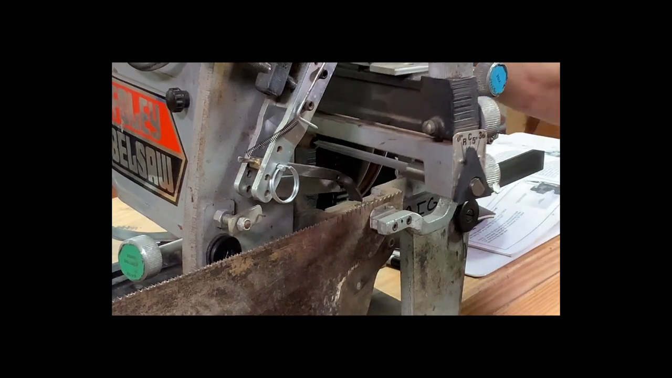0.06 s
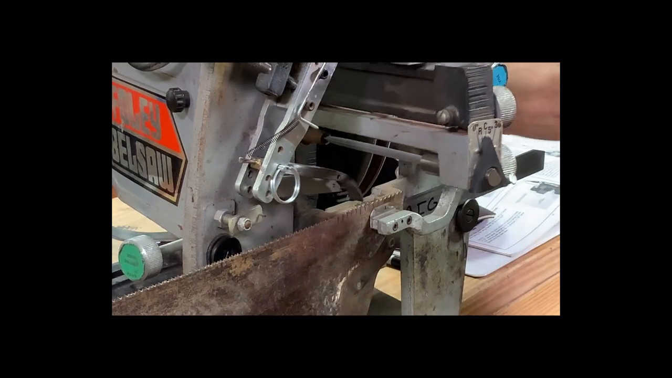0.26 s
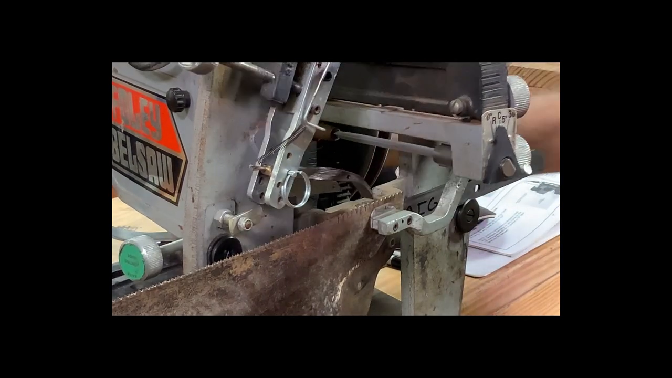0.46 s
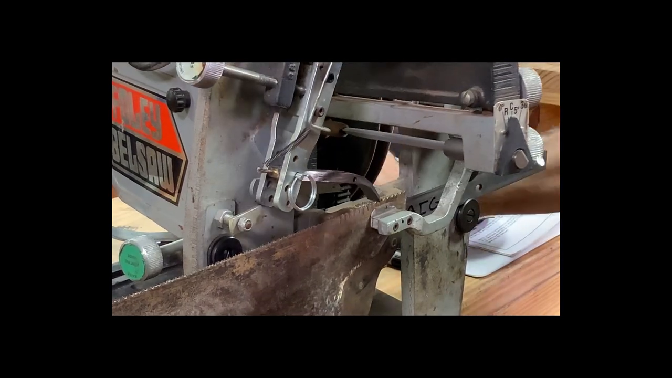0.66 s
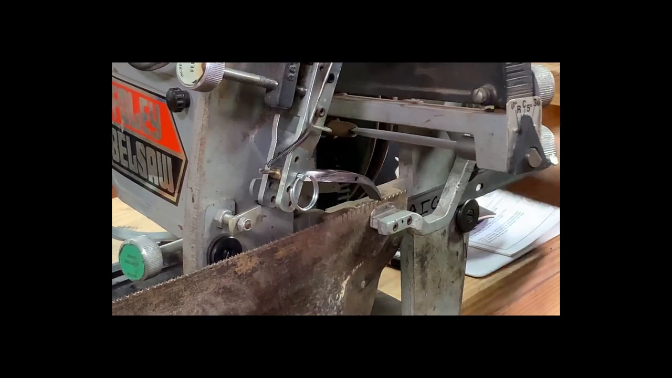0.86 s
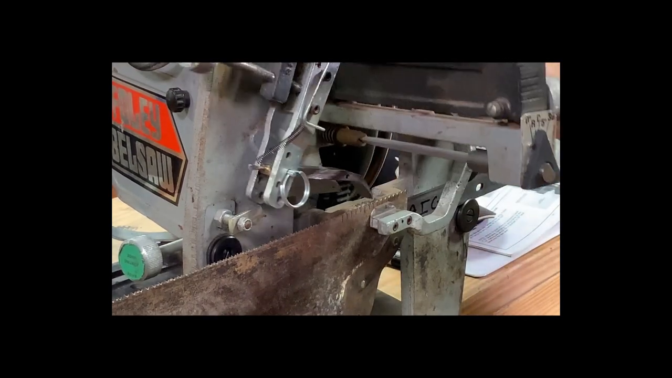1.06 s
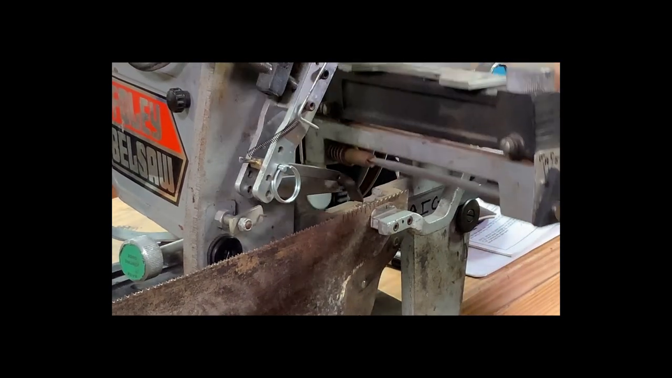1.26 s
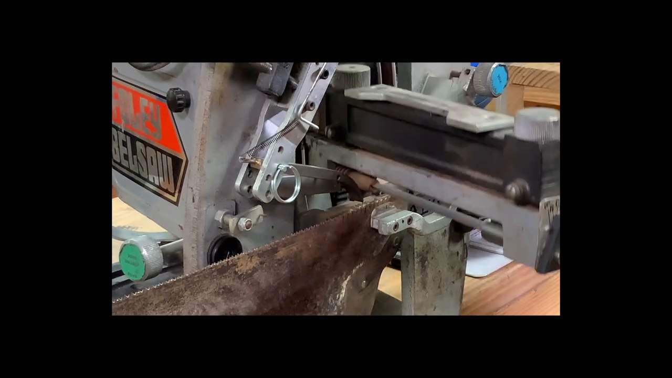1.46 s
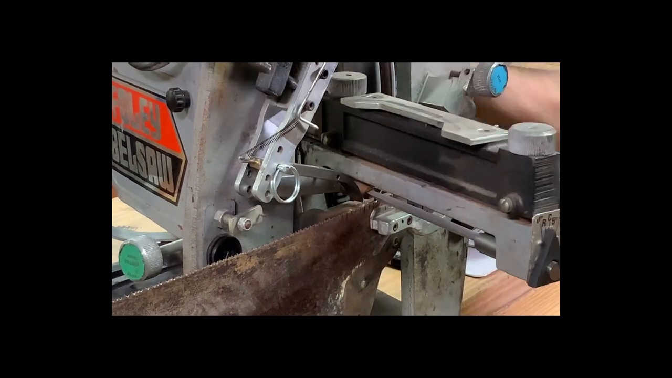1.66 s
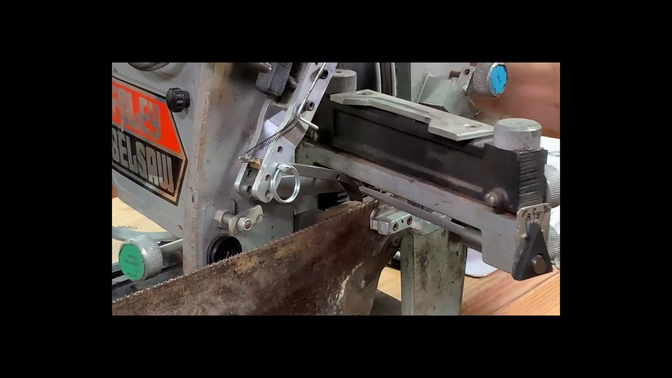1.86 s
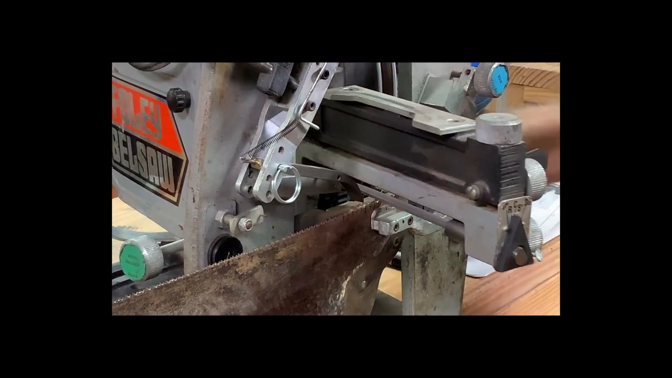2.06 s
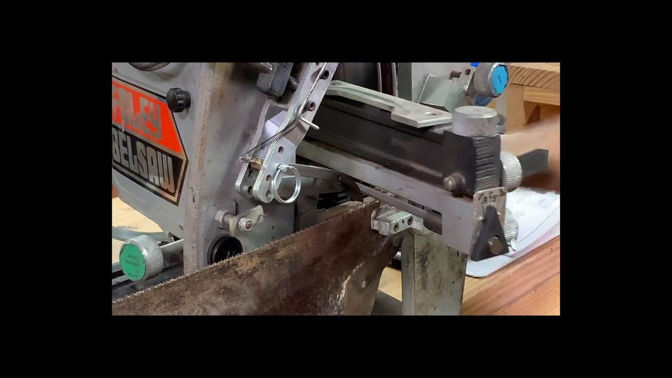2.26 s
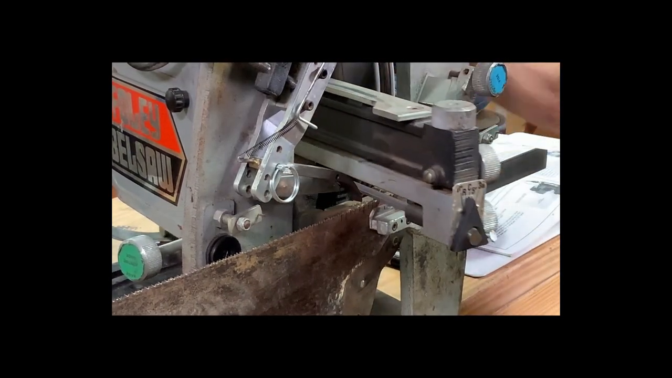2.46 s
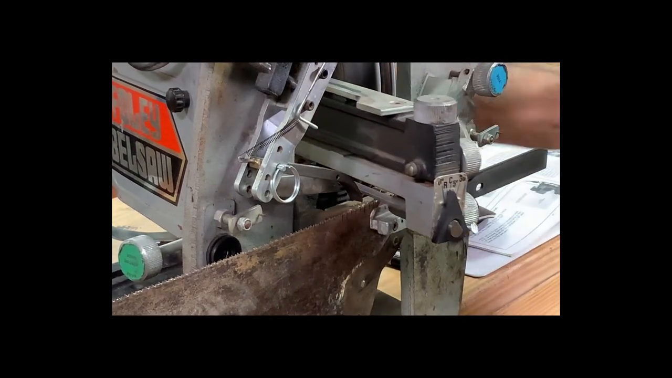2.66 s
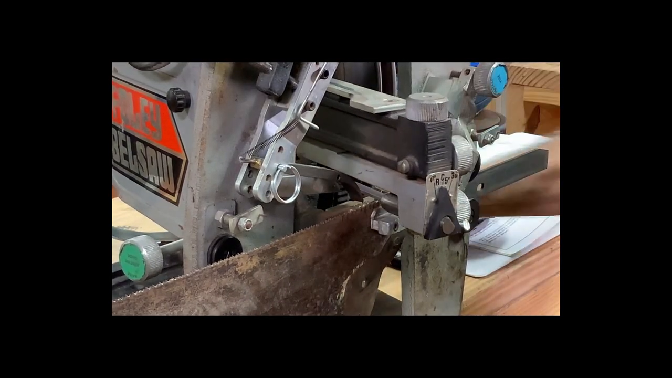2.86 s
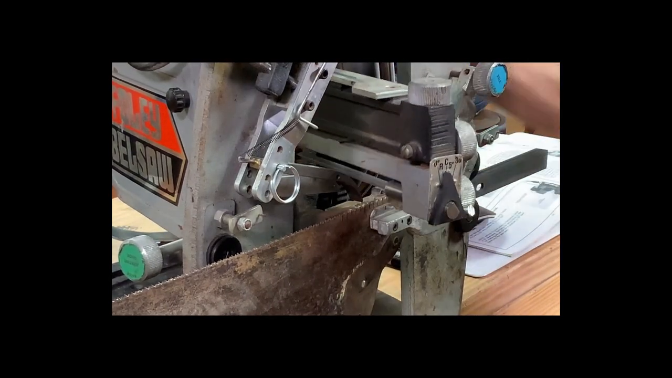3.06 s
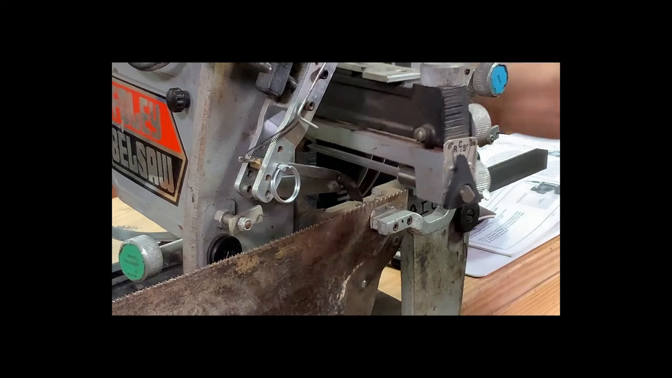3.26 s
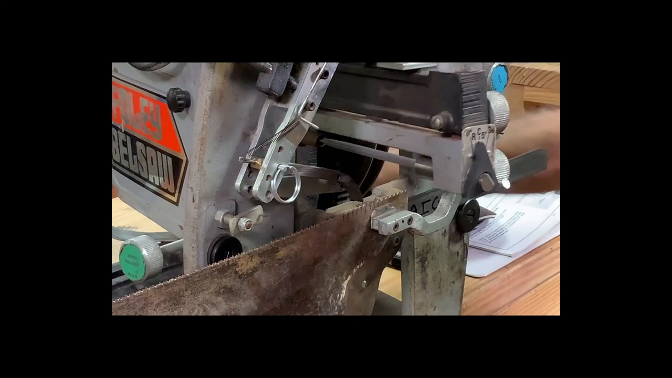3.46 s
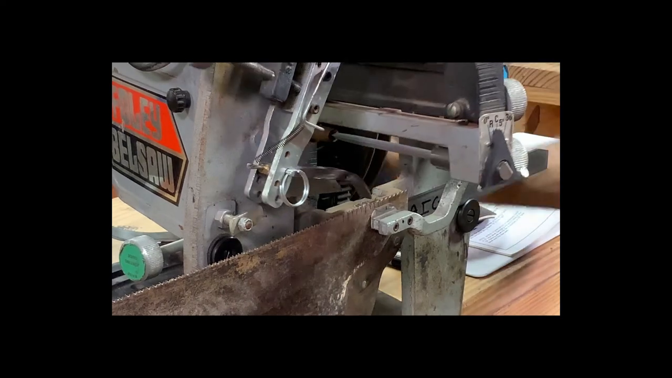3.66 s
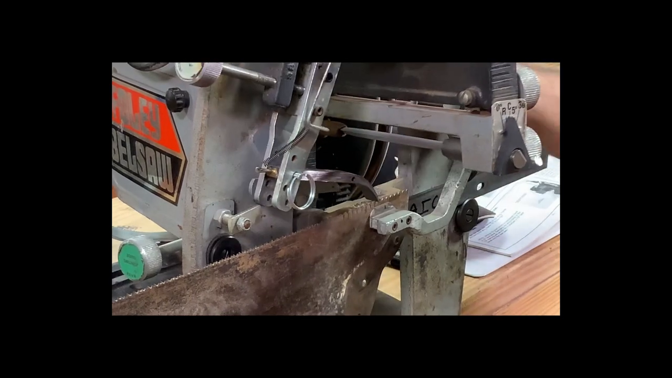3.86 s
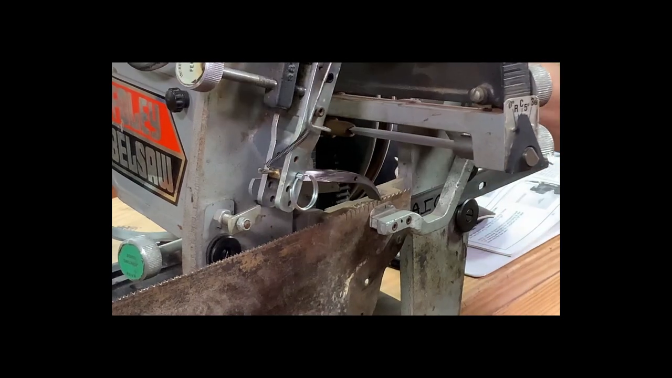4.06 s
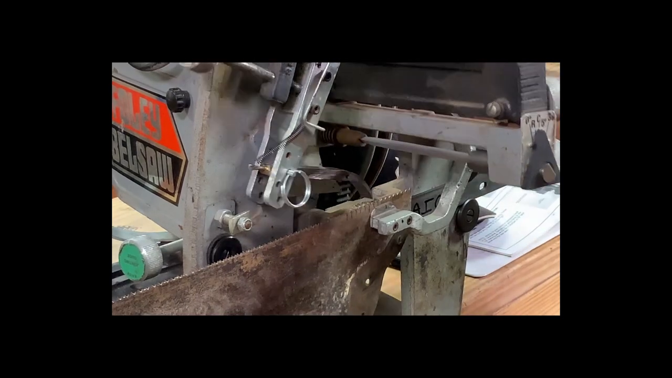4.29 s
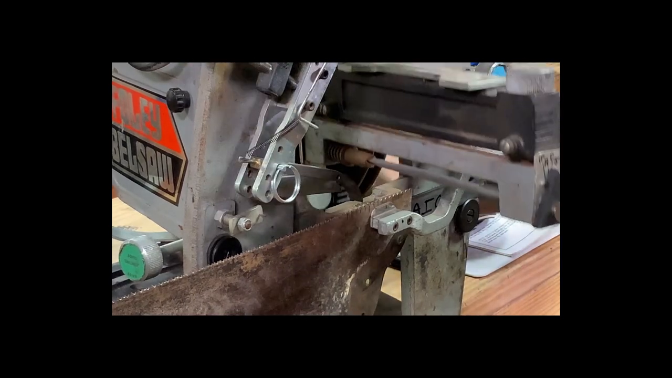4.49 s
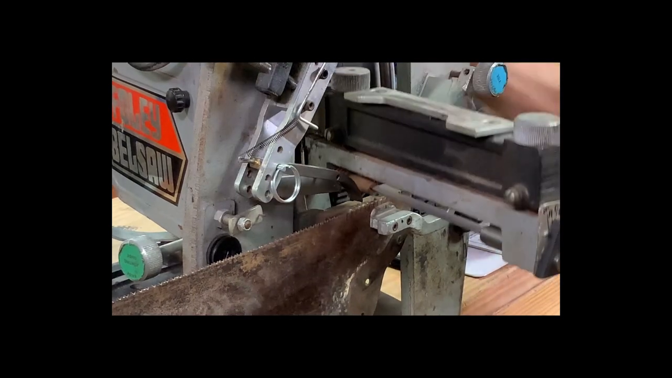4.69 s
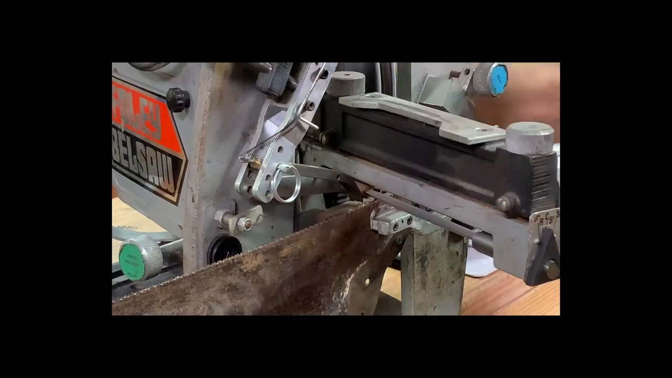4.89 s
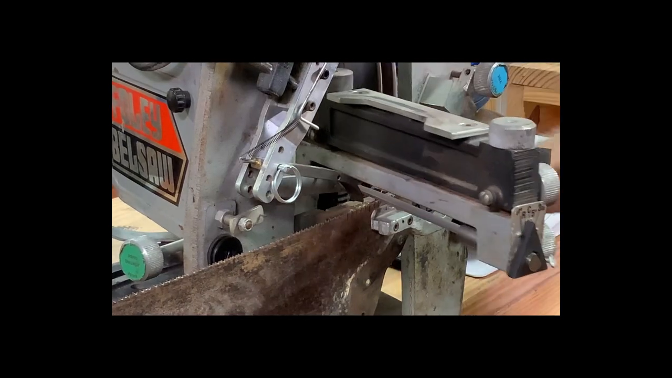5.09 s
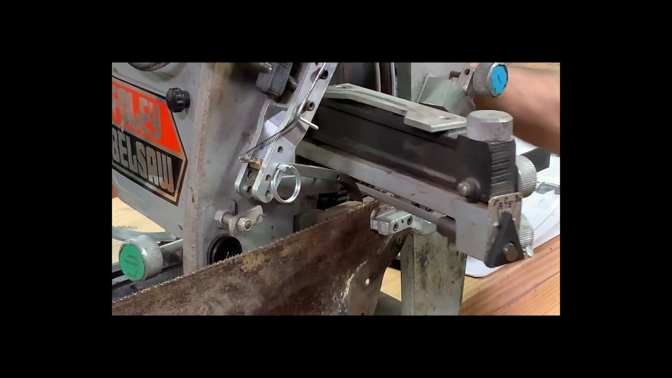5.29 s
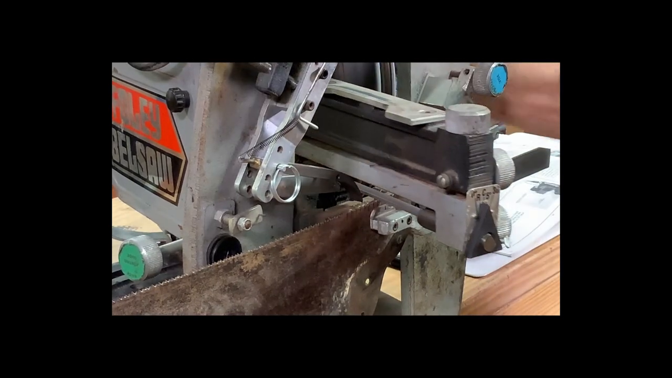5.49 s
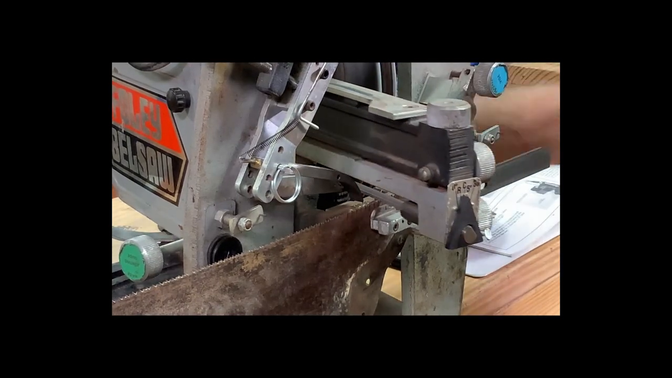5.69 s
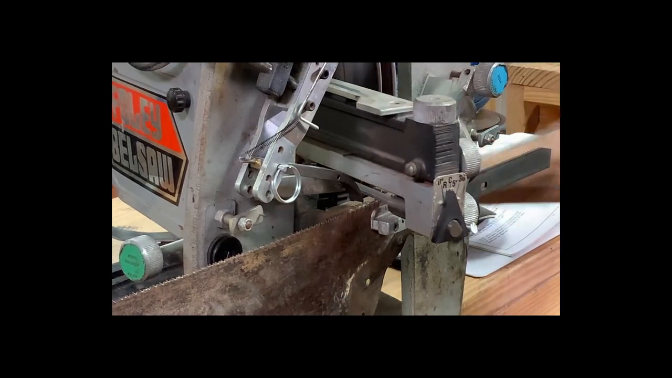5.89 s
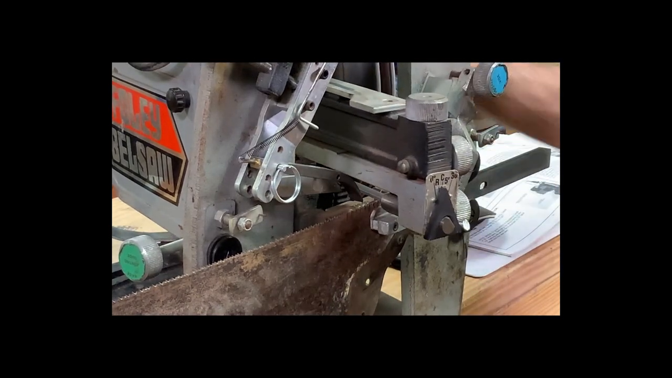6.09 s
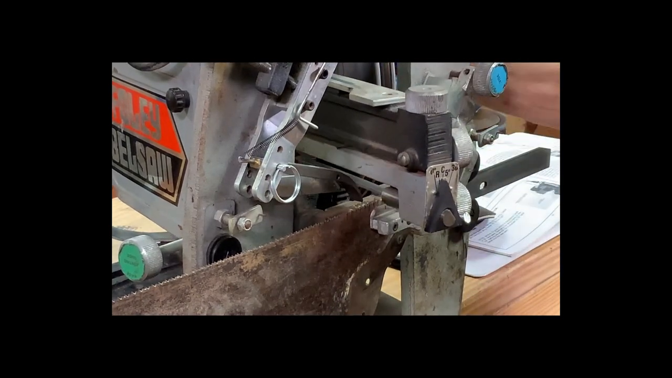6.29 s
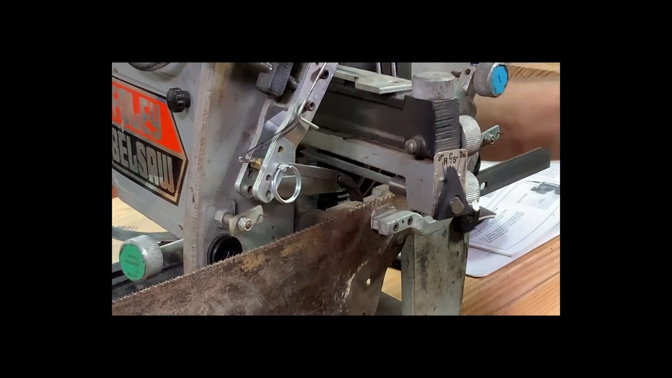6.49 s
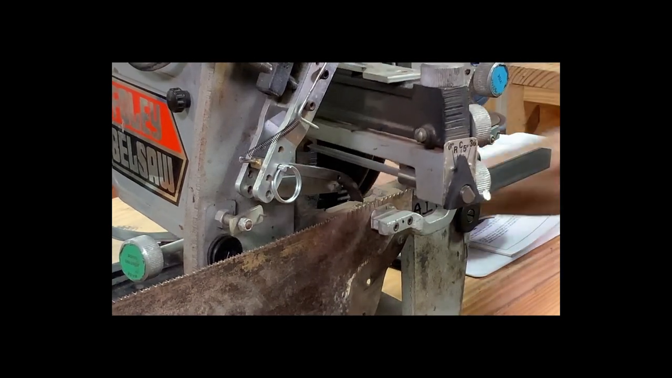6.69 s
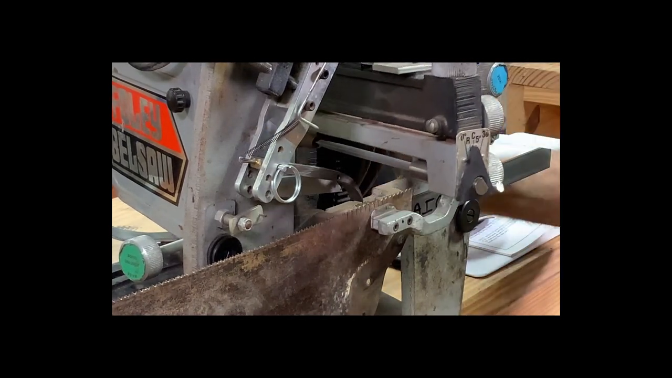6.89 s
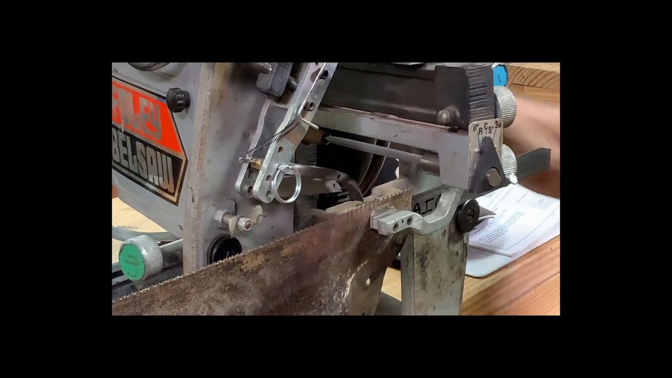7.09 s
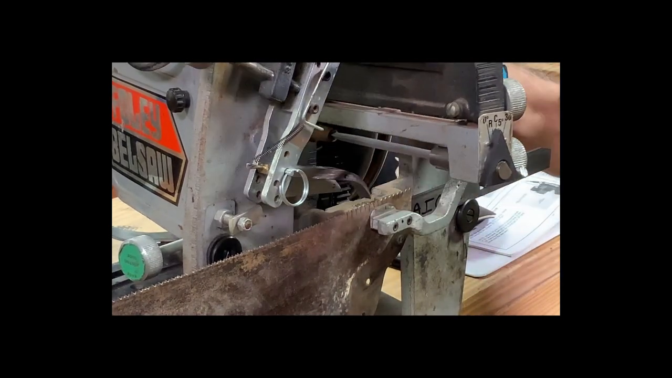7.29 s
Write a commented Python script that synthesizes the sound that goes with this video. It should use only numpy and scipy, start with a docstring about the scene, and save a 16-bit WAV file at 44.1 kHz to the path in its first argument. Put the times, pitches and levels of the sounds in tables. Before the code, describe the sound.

A saw filing machine runs in a workshop, heard close in stereo, with continuous low motor hum, rumble and faint hiss. Dull knocks and sharp metal clicks come from its linkage, strongest around 1 second. From 1.6 to 2.8 seconds a file rasps across a hand saw's teeth, catching, stalling and pushing again while the blade rings. Short, very high squeals break through; at the loudest, near 2 seconds, the hum suddenly drops. A quick falling screech follows at 2.5 seconds. The hum rises again from 3.3 seconds, with more clicks and knocks around 4.2. A second stroke scrapes from 4.8 to 6.1 seconds, with a sharp click, a piercing squeal and another drop in the hum near 5.2, then a falling screech at 5.6. From about 6.5 seconds the hum returns at a lower level, with one faint click near 7.

```python
"""A machine-driven file rasps twice across the teeth of an old hand saw in a workshop: grain noise rings on in the blade.
The blade sings in clusters of modes, breaks into short high stick-slip squeals and screeches downward in each skid.
Feed linkage clicks and knocks as struck resonances, mostly between strokes.
Motor tones, rumble and a background hiss run throughout, heard by a close pair of microphones.
Hum and rumble stand high up to each loud squeal, drop suddenly, and later rise again to a lower level."""
import sys
import numpy as np
from scipy import signal
from scipy.fft import rfft, irfft, next_fast_len
from scipy.io import wavfile
from scipy.ndimage import uniform_filter1d

SR = 44100
rng = np.random.default_rng(int(sys.argv[2]) if len(sys.argv) > 2 else 0)


def output_pcm(signal):
    """Save a mono or channel-first signal as 16-bit PCM at the path in sys.argv[1].

    Samples are clipped to [-1, 1] before scaling.
    """
    pcm = np.clip(np.atleast_2d(signal).T, -1, 1) * 32767
    wavfile.write(sys.argv[1], SR, np.round(pcm).astype(np.int16))


N = 323880
TIME = np.arange(N) / SR
SIZE = next_fast_len(N + SR)
FREQS = np.maximum(np.arange(SIZE // 2 + 1) * SR / SIZE, 1)

# File strokes, each two pushes with a stall between. Each row: touch, stall, second push and lift in seconds,
# then first push, second push and level at the lift in dB before the layer gains.
STROKES = [(1.638, 1.978, 2.236, 2.723, -31, -26.5, -36), (4.824, 5.268, 5.39, 5.992, -35, -30, -41)]
# The file catches on a tooth. Each row: start in seconds, length in seconds, scrape in dB before the layer gain,
# frequency in Hz of the blade modes it wakes, their level in dB before the layer gain.
BITES = [(1.676, 0.0232, -24, 3930, -43), (1.725, 0.019, -26.5, 4300, -30),
         (1.806, 0.031, -32.5, 3100, -24), (1.841, 0.059, -23, 1980, -31.5), (1.901, 0.038, -33, 4470, -30),
         (1.95, 0.028, -21.5, 3390, -24.5), (2.041, 0.019, -20.5, 3000, -39),
         (2.068, 0.044, -22.5, 1650, -37), (2.116, 0.053, -20, 1580, -36), (2.239, 0.021, -23, 8600, -26),
         (2.276, 0.03, -26, 4060, -24), (2.263, 0.1, -26, 1975, -30.5), (2.307, 0.037, -21, 7800, -25),
         (2.352, 0.041, -18.5, 4340, -28), (2.412, 0.033, -29.5, 1970, -38),
         (2.787, 0.028, -38.5, 3900, -49.5), (2.828, .016, -24.5, 1930, -48),
         (2.846, 0.022, -24.5, 4300, -50), (4.844, 0.019, -42, 3660, -42), (4.888, 0.057, -30, 4140, -37),
         (4.994, 0.087, -21.5, 3200, -26), (5.009, 0.041, -25.5, 1250, -32),
         (5.035, 0.045, -31, 4400, -22.5), (5.09, .04, -33.5, 2100, -34), (5.177, 0.02, -18.5, 4000, -33.5),
         (5.202, 0.039, -21.5, 1980, -33.5), (5.234, .024, -15.5, 4100, -39.5),
         (5.366, 0.041, -25, 4250, -41.5), (5.394, 0.032, -22, 4100, -36.5),
         (5.453, 0.034, -23.5, 1930, -33), (5.555, 0.048, -46, 1950, -39.5),
         (5.683, 0.019, -34.5, 1870, -46.5), (5.739, .028, -23.5, 1230, -39),
         (5.812, 0.089, -26.5, 4200, -49), (5.934, 0.025, -22, 1930, -43), (6.054, 0.013, -33.5, 3770, -57),
         (6.094, 0.035, -30, 1940, -47)]
# Once a stroke the file skids with a falling screech; one curve for each skid.
# Each row: time in seconds, pitch in Hz, level in dB before response and layer gain, line width of the fundamental in Hz.
SKIDS = [
    [(2.395, 5790, -33, 300), (2.452, 5590, -19.5, 200), (2.472, 5390, -15.5, 350), (2.482, 4930, -22, 302),
     (2.51, 4850, -20.5, 200), (2.519, 4400, -19, 400), (2.542, 4450, -33, 400), (2.556, 4220, -50, 400),
     (2.577, 4120, -26.5, 80), (2.605, 4020, -44, 200)],
    [(5.563, 5680, -37, 270), (5.583, 5660, -20.5, 110), (5.628, 5650, -20.5, 130),
     (5.64, 5050, -23.5, 110), (5.655, 4990, -19.5, 23), (5.68, 5020, -23.5, 40), (5.69, 4540, -30, 460),
     (5.725, 4400, -37.5, 600)],
]
# Spells in which hum and rumble stand high, each ended by a sudden drop.
# Each row: start in seconds, drop in seconds, motor hum in dB, rumble in dB before its climb.
HIGH_SPELLS = [(-.08, 1.965, -33.5, -35.5), (3.3, 5.22, -38.5, -40.5), (6.55, 8.4, -42, -43.5)]
# Resonances of the machine frame. Each row: frequency in Hz, width in Hz, level in dB above the broad spectrum.
FRAME_MODES = [(157, 7.5, 4.3), (274.3, 5.7, 4), (363, 6.3, 2.75), (774, 89, 4)]
AIR_DB, TOUCH_DB = -58, -40   # rasp with the file barely clear and newly set down, before the layer gains


def from_db(db):
    """Amplitude gain is ten to the power of a twentieth of the decibels."""
    return 10 ** (np.asarray(db) / 20)


def rms_one(x):
    """Normalise mean-square amplitude, so that the signal has unit power."""
    return x / np.sqrt(np.mean(x ** 2) + 1e-20)


def in_time(rows):
    """Linear interpolation joins the columns of a table into curves over time."""
    seconds, *columns = np.transpose(rows)
    return [np.interp(TIME, seconds, column) for column in columns]


def at_hz(points):
    """A table is interpolated on a logarithmic frequency axis."""
    hz, value = np.transpose(points)
    return np.interp(np.log(FREQS), np.log(hz), value)


def filtered(x, response):
    """Linear filtering: the spectrum of the signal is multiplied by a frequency response."""
    return irfft(rfft(x, SIZE) * response, SIZE)[..., :N]


def coloured(x, spectrum):
    """Spectral shaping gives a signal its colour; rms 1."""
    return rms_one(filtered(x, from_db(at_hz(spectrum))))


def drift(rate):
    """Slow random modulation: chance values joined by lines, `rate` a second, with a spread of about 1."""
    return np.interp(TIME * rate, np.arange(N // 8), rng.standard_normal(N // 8)) * np.sqrt(3 / 2)


def diffuse(pair):
    """Interchannel coherence: two unrelated signals are mixed as mid and side into a partly alike left and right."""
    # Each row: frequency in Hz, left-right likeness of diffuse sound (0-1).
    likeness = [(150, .999), (400, .87), (800, .55), (1800, .2), (2500, .96), (2600, .9999), (2980, .9999),
                (3100, .95), (3600, .6), (5000, .6), (6100, .9), (7400, .6), (8700, .95), (12000, .75),
                (15000, .5)]
    alike = at_hz(likeness)
    mid, side = filtered(pair, np.sqrt([(1 + alike) / 2, (1 - alike) / 2]))
    return np.array([mid + side, mid - side])


def dense_modes(t60):
    """High modal density: a stereo ring of very many modes with one decay time acts as fading noise; unit energy."""
    fade = from_db(-60 * np.minimum(TIME / t60, 3))
    tail = diffuse(rng.standard_normal((2, N)) * fade)[:, :SR]
    return rfft(tail / np.sqrt(np.sum(tail ** 2) / 2), SIZE)


def resonant(x, modes):
    """Modal resonance: a body lifts the signal around its natural frequencies."""
    return filtered(x, 1 + sum((from_db(db) - 1) / (1 + 2j * (FREQS - hz) / width) for hz, width, db in modes))


def climb():
    """Ramp modulation, 0-1: it rises towards the end of each high spell, then drops."""
    rise_s, drop_s = 0.76, 0.037
    return sum(np.interp(TIME - drop, [-rise_s, 0, drop_s], [0, 1, 0]) for _, drop, _, _ in HIGH_SPELLS)


def drive_levels():
    """Level modulation, in dB: hum and rumble stand high up to each drop, and later rise again to a lower level."""
    low_hum_db, low_rumble_db, climb_db = -44, -42.5, 4.5
    rise_s, drop_s = 0.16, 0.037
    rumble = low_rumble_db + climb_db * climb()
    hum = low_hum_db
    for start, drop, hum_db, rumble_db in HIGH_SPELLS:
        high = np.interp(TIME, [start, start + rise_s, drop, drop + drop_s], [0, 1, 1, 0])
        rumble = rumble + high * (rumble_db - low_rumble_db)
        hum = hum + high * (hum_db - low_hum_db)
    return rumble, hum


def background_level():
    """Level of the background hiss, in dB: it slowly sinks, but swells in the middle of each stroke."""
    start_db, sink_db_per_s = -53, 1.33
    swell_db, half_width_s = 15, 0.54
    swelling = sum(np.exp(-((TIME - (touch + lift) / 2) / half_width_s) ** 2 / 2)
                   for touch, _, _, lift, *_ in STROKES)
    return start_db - sink_db_per_s * TIME + swell_db * swelling


def pulley(ring_hz=1330, width_hz=85, turns_per_s=15.0, throb_db=11.5):
    """Periodic rubbing: friction noise throbs once each turn of a pulley and excites a soft resonance; rms 1."""
    throb = from_db(throb_db * np.cos(2 * np.pi * turns_per_s * TIME + drift(1.9)))
    rubbing = diffuse(rng.standard_normal((2, N))) * throb
    return rms_one(filtered(rubbing, 1 / (1 + 1j * (FREQS - ring_hz) / width_hz) ** 2))


def machine(boom_db=-4, boom_hz=80, pulley_db=-20, hiss_db=-1.5, waver_db=0.45, rattle_db=1.5, flutter_db=2.5):
    """Rotating machinery radiates steady tones and broadband rumble of belt and bearings, over a background hiss."""
    # Tones of the motor shaft and the mains. Each row: frequency in Hz, level in dB relative to the motor hum.
    shaft_tones = [(58.5, -8.5), (119.9, 0.5), (239.9, -23.5)]
    # Belt tones on successive multiples of the belt rate. Each entry: level in dB relative to the motor hum.
    belt_levels = [-14, -8.5, -28.5, -20]
    belt_hz = 94.55
    # Spectra of the rumble and of the hiss. Each row: frequency in Hz, relative density in dB.
    rumble_colour = [(25, -64), (38, -14), (52, -1.5), (100, -4), (155, 0), (230, -6.5), (400, -9),
                     (620, -15.5), (1000, -20.5), (1350, -20.5), (2200, -28.5), (3500, -31.5)]
    hiss_colour = [(1500, -6), (2600, -83), (3700, -3), (7000, 1.5), (11000, -2.5), (15500, -14.5)]

    drive_db, motor_db = drive_levels()
    hum = 0
    for hz, db in shaft_tones + [(k * belt_hz, db) for k, db in enumerate(belt_levels, 1)]:
        gain = from_db(db + waver_db * drift(4.8))
        phase = 2 * np.pi * (hz * TIME + rng.random()) + hz / 2500 * drift(1.3)
        hum = hum + gain * np.sqrt(2) * np.sin(phase)
    shaking = diffuse(rng.standard_normal((2, N))) * from_db(rattle_db * drift(40))
    rumble = coloured(resonant(shaking, FRAME_MODES), rumble_colour + [(7000, -41.5)])
    boom = filtered(rumble, 1 / (1 + (FREQS / boom_hz) ** 6))   # the deepest shaking comes from the motor
    motor = from_db(motor_db) * (hum + from_db(boom_db) * boom)
    drive = from_db(drive_db) * (rumble - boom + from_db(pulley_db) * pulley())
    hiss_level = background_level() + hiss_db + flutter_db * drift(90)
    hiss = coloured(diffuse(rng.standard_normal((2, N))), hiss_colour) * from_db(hiss_level)
    return motor + drive + hiss


def struck(blows, colour, modes, crack_s, ring_s, ring_db):
    """Impact excitation: parts meet with a hard crack and a brief tail of noise, coloured by the body's modes."""
    force = np.zeros(N)
    age = TIME[:SR // 5]
    decay = np.exp(-age / crack_s) + from_db(ring_db) * np.exp(-age / ring_s)
    for s, db, *_ in blows:
        on = slice(int(s * SR), int(s * SR) + len(age))
        force[on] += (from_db(db) * decay)[:len(force[on])]
    return resonant(force * coloured(rng.standard_normal(N), colour), modes)


def linkage(click_db=-4.5, knock_db=-1, ping_db=-13, ping_t60_s=0.071):
    """Impact and free decay: the light pawl clicks, the lever that it hits pings, and heavy parts knock."""
    # Clicks of the feed pawl and its linkage.
    # Each row: start in seconds, level in dB before the layer gain, frequency in Hz of the lever that pings.
    pawl_blows = [(.336, -33.5, 3730), (.967, -20, 13870), (1.0357, -19, 13400), (1.077, -36, 10500),
                  (1.186, -43, 13000), (1.248, -35.5, 9700), (3.588, -40.5, 4800), (3.989, -45, 3900),
                  (4.1592, -32.5, 3930), (4.2379, -25, 4330), (4.45, -38.5, 10000), (4.804, -43, 7000),
                  (5.1742, -15, 12500), (7.137, -46, 5420)]
    # Dull knocks of the carriage and the cam follower. Each row: start in seconds, level in dB before the layer gain.
    carriage_blows = [(.056, -36), (.15, -38), (.972, -37), (1.039, -37.5), (1.162, -36.5), (1.254, -39),
                      (3.175, -45), (4.0, -39.5), (4.168, -42), (4.241, -45.5), (6.186, -44)]
    # Spectra of the two kinds of blow. Each row: frequency in Hz, relative density in dB.
    click_colour = [(300, -10), (1300, -12.5), (2200, 8), (4000, 6), (7000, 2), (10000, 4), (13500, 2),
                    (16000, -2)]
    knock_colour = [(100, 6.5), (400, 3.5), (800, 2), (1400, 1), (2200, -9.5), (4000, -11), (10000, -23)]
    # Resonances of the pawl. Each row: frequency in Hz, width in Hz, level in dB above the broad spectrum.
    pawl_modes = [(1380, 90, 3.8), (3700, 63, 2), (5380, 61, 6), (7740, 150, 9), (9900, 76, 2.8)]

    clicks = struck(pawl_blows, click_colour, pawl_modes, crack_s=0.0021, ring_s=0.011, ring_db=-7.0)
    for s, db, hz in pawl_blows:
        start = int(s * SR)
        age = TIME[:min(SR // 4, N - start)]
        ping = from_db(db + ping_db - 60 * age / ping_t60_s) * np.sin(2 * np.pi * hz * age)
        clicks[start:start + len(age)] += ping
    knocks = struck(carriage_blows, knock_colour, FRAME_MODES, crack_s=0.014, ring_s=0.13, ring_db=-10.0)
    return from_db(click_db) * clicks + from_db(knock_db) * knocks


def beating(size, share, beats_hz):
    """Beats of neighbouring modes break a tone into short bursts: a random complex gain of power about 1."""
    poles = signal.butter(2, beats_hz, fs=SR, output="sos")
    real, imaginary = signal.sosfilt(poles, rng.standard_normal((2, size + SR // 10)))[:, -size:]
    return np.sqrt(1 - share) + np.sqrt(share / 2) * (rms_one(real) + 1j * rms_one(imaginary))


def slipping(hz, width_hz, broken=.3, beats_hz=120):
    """Stick-slip oscillation on a pitch curve: uneven slips blur its line and beats break it up; rms 1."""
    slips = uniform_filter1d(rng.standard_normal(len(hz)), size=56)
    blur = slips * np.sqrt(2 * np.pi * width_hz / SR)
    phase = np.cumsum(2 * np.pi * hz / SR + blur)
    return rms_one(np.real(np.exp(1j * phase) * beating(len(hz), broken, beats_hz)))


def groan(mode_hz=153, width_hz=5, level_db=-41.5):
    """Low-mode excitation: the frame drones in its lowest mode as the rumble climbs."""
    drone = slipping(np.full(N, float(mode_hz)), width_hz, broken=0)
    return from_db(level_db) * np.sqrt(climb()) * drone


def swell(start, length, rise):
    """Build-up and release: a contact grows over the first share of its length, then lets go."""
    moments = start + length * np.array([0, rise, (1 + rise) / 2, 1])
    return np.interp(TIME, moments, [0.00026, 0.78, 0.38, 0.00043])


def squeals(level_db=-1.2):
    """Mode locking: stick-slip at the tooth settles into one mode for a moment. The rows at 1.246 s and 4.446 s
    are brief 10 kHz chirps that go with pawl clicks, not with the file."""
    # Each row: start in seconds, length in seconds, frequency in Hz, level in dB before the layer gain, line width in Hz.
    locked_modes = [(1.246, .012, 9700, -34.5, 250), (1.767, 0.019, 11050, -30, 100),
                    (1.80, 0.05, 11400, -25, 80), (1.866, 0.05, 15150, -11, 110),
                    (1.968, 0.029, 13700, -4.5, 60), (1.99, 0.023, 13900, -10, 100),
                    (2.12, 0.047, 11340, -23.5, 200), (2.156, 0.022, 11300, -14.5, 120),
                    (2.375, 0.021, 10960, -15, 70), (2.37, .016, 13100, -19, 400),
                    (2.664, .02, 11320, -14.5, 220), (4.446, 0.012, 9800, -42.5, 250),
                    (5.242, 0.028, 13400, -15, 500), (5.243, 0.0287, 11030, -5.5, 60),
                    (5.284, 0.028, 11400, -15.5, 130), (5.519, 0.033, 10940, -9.5, 140),
                    (5.514, 0.025, 13100, -19, 400), (5.835, 0.032, 10970, -9.5, 140),
                    (5.845, 0.052, 11570, -16, 300), (5.908, 0.052, 13260, -19.5, 220)]
    out = np.zeros(N)
    for s, length, hz, db, width_hz in locked_modes:
        on = slice(int(s * SR), int((s + length) * SR))
        tone = slipping(np.full_like(TIME[on], hz), width_hz)
        out[on] += from_db(db + level_db) * swell(s, length, rise=0.298)[on] * tone
    return out


def pressure(touch, stall, push, lift, first_db, second_db, end_db):
    """Contact force sets the noise level, in dB: the file bears in, stalls, grips again and eases off to lift."""
    set_down_s, build_s, let_go_s, grip_s, lift_off_s = 0.04, 0.1, 0.019, 0.028, 0.31
    stall_db = -42
    level, = in_time([(touch, AIR_DB), (touch + set_down_s, TOUCH_DB),
                      (touch + set_down_s + build_s, first_db), (stall, first_db),
                      (stall + let_go_s, stall_db), (push, stall_db),
                      (push + grip_s, second_db), (lift, end_db), (lift + lift_off_s, AIR_DB)])
    return level


def blade_ring(edge_db):
    """Driven vibration of the blade, in dB: it follows the rasp, climbs with the rumble and is damped in each skid."""
    ring_db, climb_db = -43, 6.5   # ring at the touch level; extra at the top of the climb
    follows = 0.4   # share of the rasp's swing in dB
    damping_db, half_width_s = -8.5, 0.032
    skidding = sum(np.exp(-((TIME - np.mean([row[0] for row in skid])) / half_width_s) ** 2 / 2) for skid in SKIDS)
    return ring_db + follows * (edge_db - TOUCH_DB) + climb_db * climb() + damping_db * skidding


def bite(start, length, attack_s=0.0014):
    """Sudden contact: the file grabs at once, holds and works itself free."""
    moments = [0, min(attack_s, length / 2), length * 0.73, length]
    return np.interp(TIME - start, moments, [0.00023, 1.0, 1.0, 0.000179])


def grains(per_s, spread_db):
    """Random impulse train: tiny contacts at random moments and of uneven size; rms 1."""
    sizes = from_db(spread_db * np.minimum(rng.exponential(1, N), 4)) * rng.choice([-1, 1], N)
    return rms_one(sizes * (rng.random(N) < per_s / SR))


def wandering(x, modes, wander_db=3.0, shifts_per_s=11):
    """Position-dependent coupling: resonances come and go as the point of contact moves."""
    return x + sum((resonant(x, [mode]) - x) * from_db(wander_db * drift(shifts_per_s)) for mode in modes)


def rasp(edge_db=6.5, blade_db=13.0, bite_db=-5.5, jolt_db=-9, chatter_db=2.0, chatter_rate=190, split_hz=3300):
    """Cutting noise: file teeth chip at the steel, the grip chatters, and the blade carries the lower part."""
    # Resonances of the blade. Each row: frequency in Hz, width in Hz, level in dB above the broad spectrum.
    blade_modes = [(1258, 62, 7.5), (1964, 94, 4.5), (4420, 230, 4), (5900, 260, -1), (7700, 150, 1)]
    # Spectrum of the chips. Each row: frequency in Hz, relative density in dB.
    chip_colour = [(150, -2), (500, -6), (900, -3.5), (1250, -7), (1550, -3.5), (2000, -3.5), (2550, 0),
                   (3200, 0.5), (3700, 3), (4400, -3), (5200, -6), (6500, -4.5), (8000, -1), (11300, 0),
                   (15500, -3)]

    edge, blade = np.zeros(N), np.zeros(N)
    for stroke in STROKES:
        edge_level = pressure(*stroke)
        touching = 1 - from_db(AIR_DB - edge_level)   # fades to nothing as the file comes clear
        edge += touching * from_db(edge_level + edge_db)
        blade += touching * from_db(blade_ring(edge_level) + blade_db)
    catches = sum(from_db(db) * bite(s, length) for s, length, db, _, _ in BITES)
    edge = edge + from_db(bite_db) * catches
    blade = np.hypot(blade, from_db(jolt_db) * catches)   # each catch jolts the blade as well
    contacts = grains(per_s=8500, spread_db=3.0) * from_db(chatter_db * drift(chatter_rate))
    chips = coloured(wandering(contacts, blade_modes), [(40, -49.0)] + chip_colour)
    low = filtered(chips, 1 / (1 + (FREQS / split_hz) ** 6))
    return blade * low + edge * (chips - low)


def saw_plate(x, shifts_per_s=7.0, count=5, t60_s=0.068, plate_db=-7.5):
    """Plate reverberation: as the point of contact moves, it wakes one set of dense modes after another."""
    plate, out = from_db(plate_db), x
    for k in range(count):
        distance = np.abs((TIME * shifts_per_s - k) % count - count / 2)
        share = np.sqrt(np.maximum(1 - distance, 0))   # neighbouring sets crossfade at equal power
        out = out + plate * filtered(x * share, dense_modes(t60_s))
    return out / np.hypot(1, plate)


def woken_modes(level_db=-3.0, width_share=0.092):
    """Selective excitation: each catch makes the blade sing in one cluster of modes, heard as narrow-band noise."""
    out = np.zeros(N)
    for s, length, _, hz, db in BITES:
        on = slice(int(s * SR), int((s + length) * SR))
        band = [hz * (1 - width_share / 2), hz * (1 + width_share / 2)]
        cluster = signal.butter(2, band, "band", fs=SR, output="sos")
        ring = signal.sosfilt(cluster, rng.standard_normal(SR // 4))[-len(TIME[on]):]
        out[on] += from_db(db + level_db) * bite(s, length)[on] * rms_one(ring)
    return out


def skids(level_db=-0.8, count=3, spread_hz=70):
    """Source and resonator: as a skid slows, its harmonics fall and flare as they cross resonances of the tooth."""
    # Resonant response of the tooth. Each row: frequency in Hz, gain in dB.
    tooth_response = [(4100, -0.5), (5000, -3), (5550, -20), (8300, -11), (9600, -2.5), (10400, -10.5),
                      (11250, 6), (12100, -6.5), (13500, -9.5), (15100, -11), (16500, -23.5)]
    out = np.zeros(N)
    for skid in SKIDS:
        on = slice(int(skid[0][0] * SR), int(skid[-1][0] * SR))
        hz, db, width_hz = (column[on] for column in in_time(skid))
        for k in range(1, count + 1):
            response_db = np.interp(k * hz, *np.transpose(tooth_response))
            blurred_hz = width_hz + spread_hz * (k - 1)   # higher harmonics are more blurred
            out[on] += from_db(db + response_db + level_db) * slipping(k * hz, blurred_hz, broken=0.53)
    return out


def workshop(x, t60_s=0.4, room_db=-5, air_hz=13000):
    """Room reverberation: direct sound plus a dense decay that loses its very top to air absorption."""
    air = 1 / np.sqrt(1 + (FREQS / air_hz) ** 6)
    return filtered(x, 1 + from_db(room_db) * dense_modes(t60_s) * air)


def scene():
    """Superposition: filing rings in the saw plate, near sounds excite the workshop, and the machine is added."""
    near = saw_plate(rasp()) + woken_modes() + squeals() + skids() + linkage()
    return workshop(near) + machine() + groan()


def record(dry, low_cut_hz=42, cutoff_hz=15800):
    """Stereo reception: two microphone ports differ in phase and level; deep bass and the top are cut."""
    # Each row: frequency in Hz, phase in radians by which left leads.
    port_phase = [(400, 0), (900, 1.2), (1400, 1.1), (2000, -1), (2450, -2.75), (2600, -3.13),
                  (2980, -3.15), (3130, -3.52), (3300, -4.3), (4000, -5.8), (5300, -5.7), (6100, -6.2),
                  (7400, -5.1), (8500, -6.3), (11000, -6.8), (15000, -7.1)]
    # Each row: frequency in Hz, left minus right in dB.
    port_balance = [(220, 0), (900, 2.4), (1600, 2.2), (1900, -3), (2500, 0), (4000, 0)]
    sides = np.array([[1], [-1]])   # left and right each take half of the difference
    ports = from_db(at_hz(port_balance) / 2 * sides) * np.exp(.5j * at_hz(port_phase) * sides)
    low_cut = 1 / np.sqrt(1 + (low_cut_hz / FREQS) ** 10)
    high_cut = 1 / np.sqrt(1 + (FREQS / cutoff_hz) ** 240)
    return filtered(dry, ports * low_cut * high_cut)


dry = scene()
out = record(dry)
output_pcm(out)
```